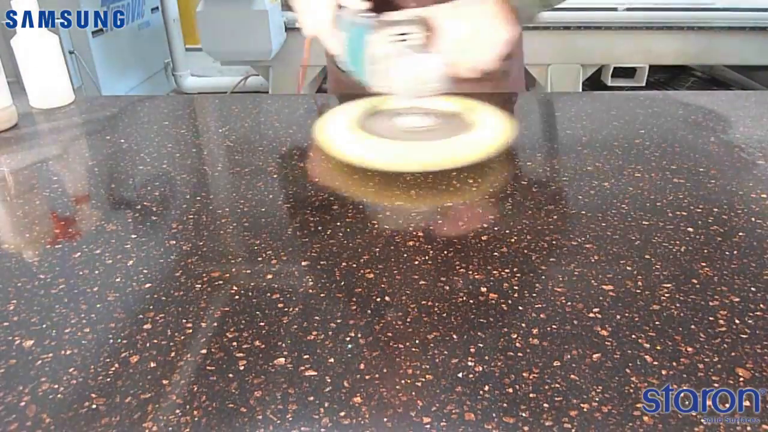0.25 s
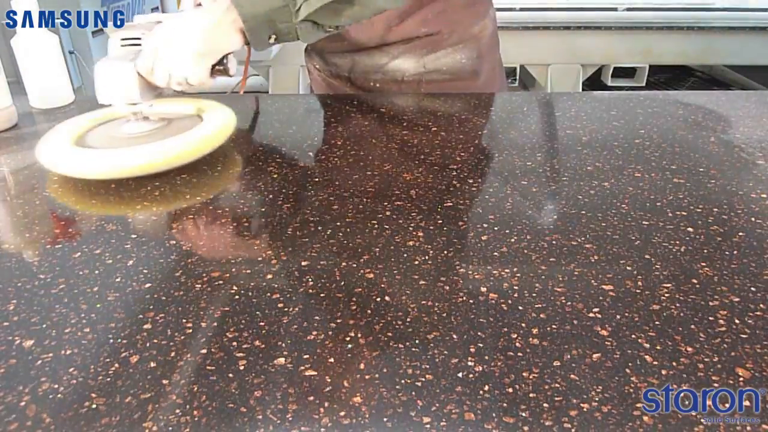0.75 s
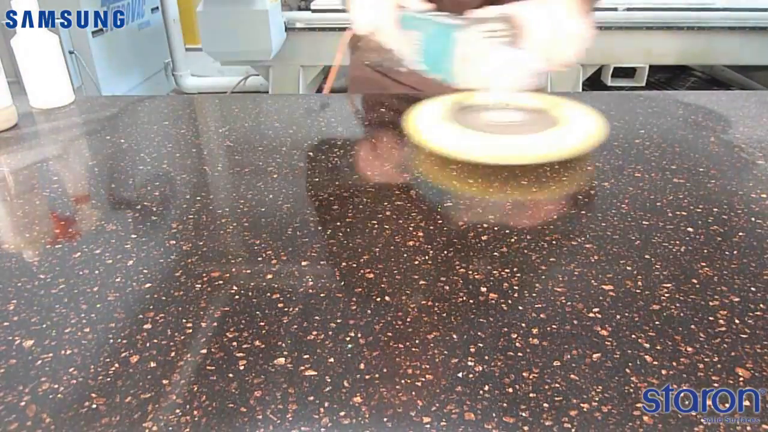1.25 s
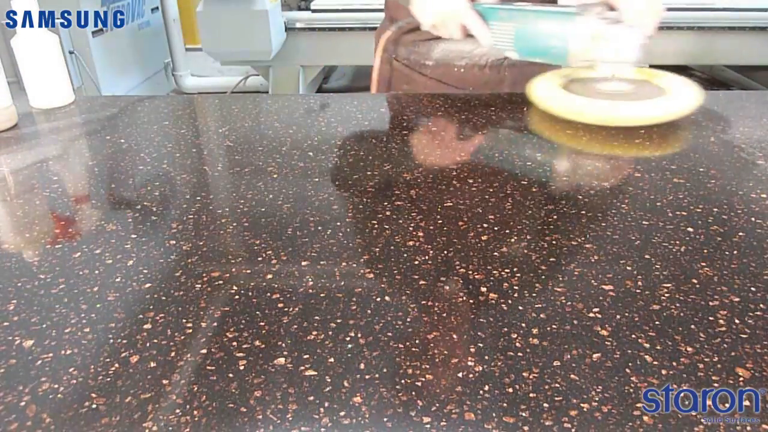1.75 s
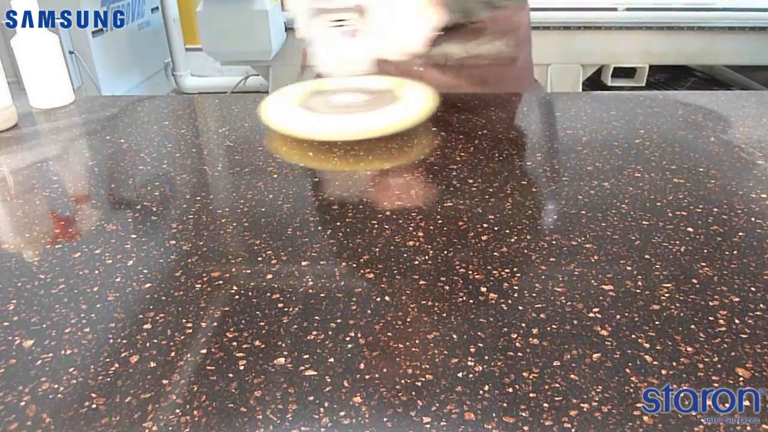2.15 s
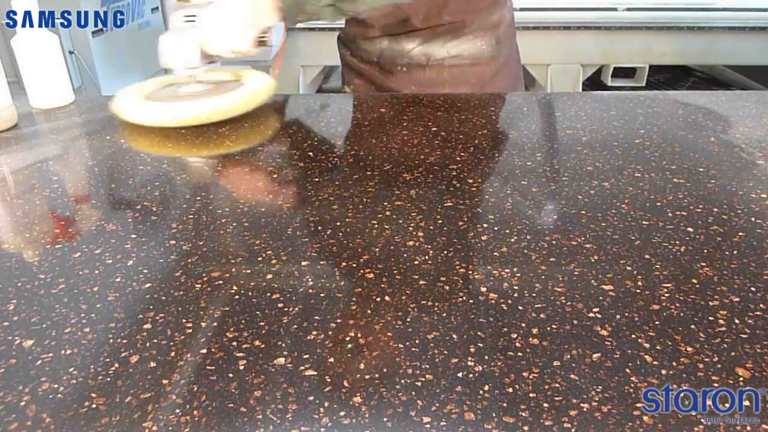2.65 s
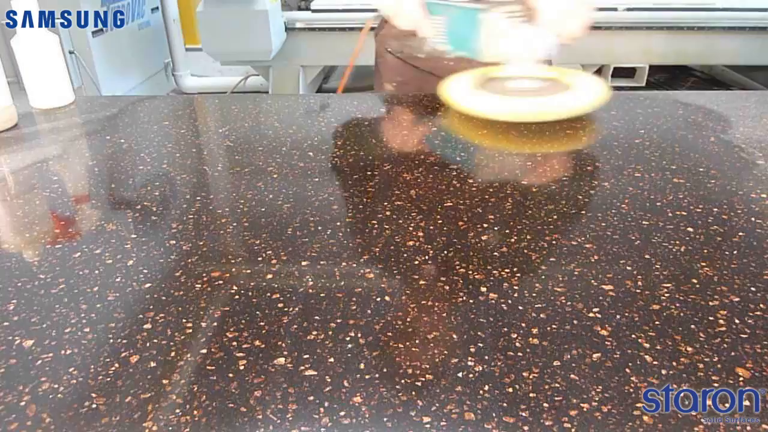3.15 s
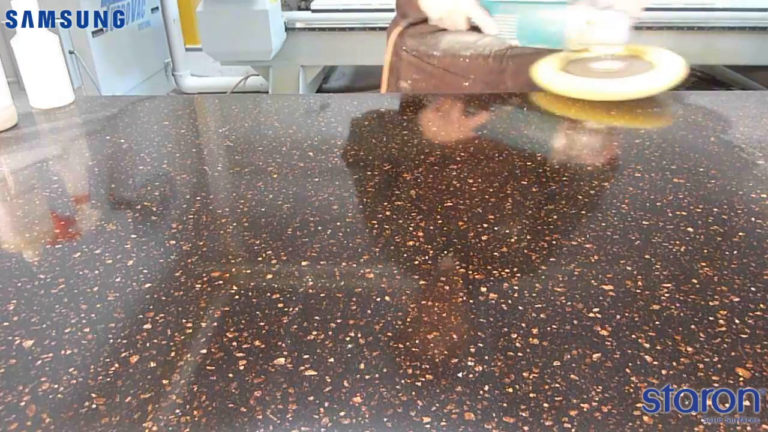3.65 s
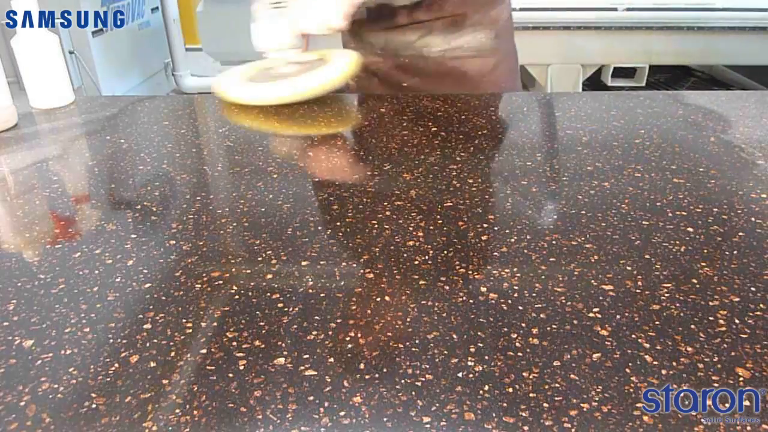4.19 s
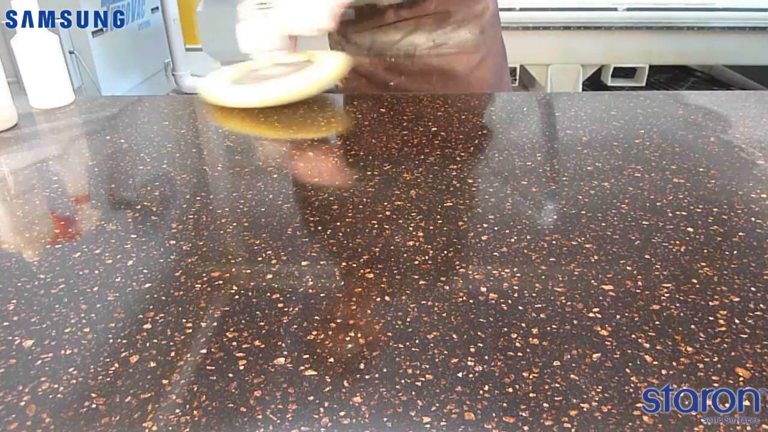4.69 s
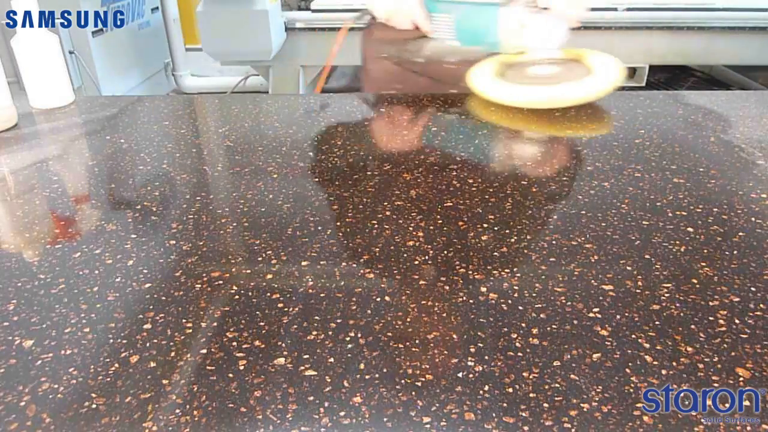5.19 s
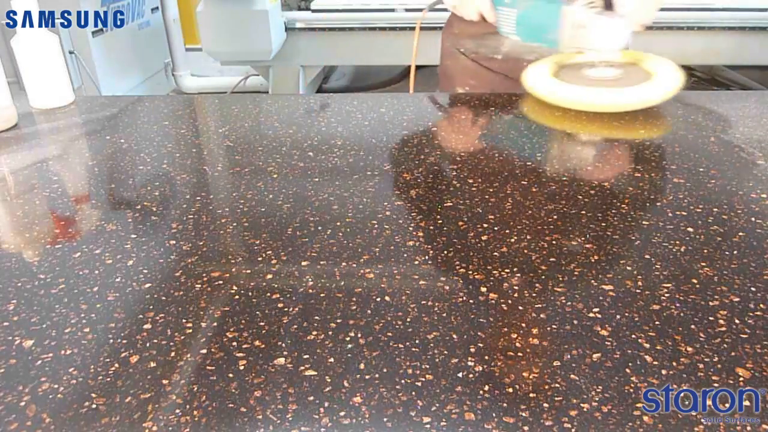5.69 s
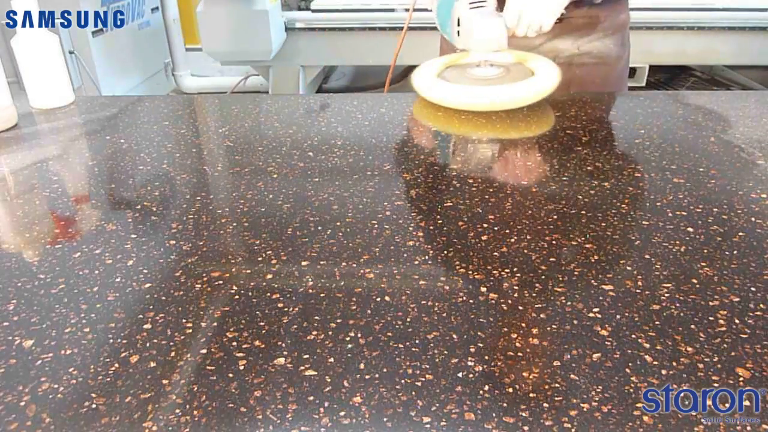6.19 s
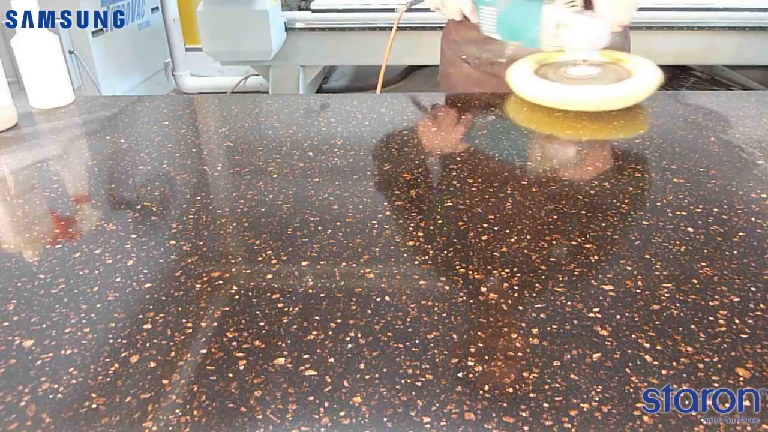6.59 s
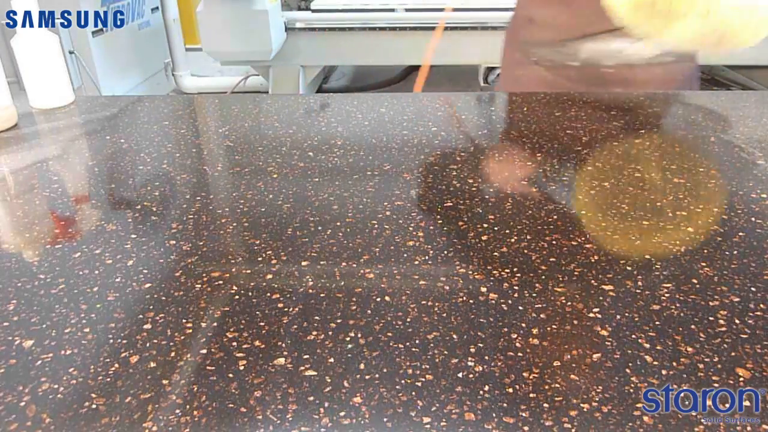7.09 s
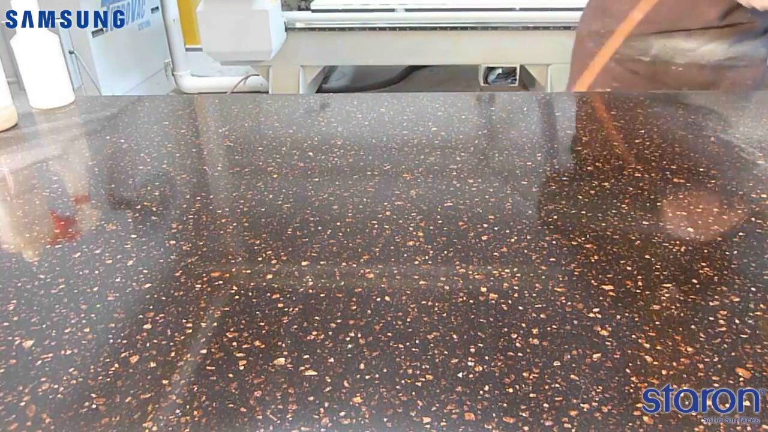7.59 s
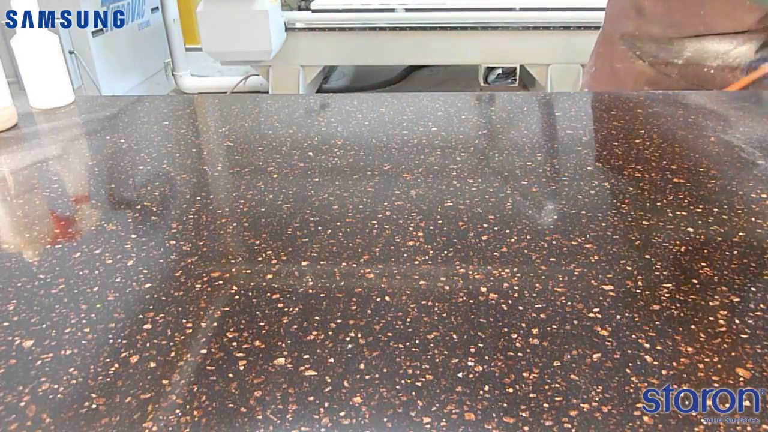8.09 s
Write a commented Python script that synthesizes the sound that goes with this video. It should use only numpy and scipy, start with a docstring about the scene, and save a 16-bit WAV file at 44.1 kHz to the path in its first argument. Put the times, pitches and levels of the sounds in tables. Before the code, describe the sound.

From the start, an electric rotary polisher runs close by, buffing a countertop with a foam pad. It makes a high, buzzing gear whine with a fast rattle and a rush of fan air. The pitch rises slightly over the first two seconds, then holds, while the tones swell and dip and the sound sweeps left and right about every two seconds. At about 5.1 seconds the tool is switched off and coasts: loose gear teeth clatter, and the whine falls steadily with a dry rasp, dying away by 7 seconds. Around 7.2 seconds a few light, sharp clicks come as the tool is lifted, with a fainter one near 7.6. The cord slides with a soft swish from 7.5 to 7.9 seconds. A low, steady machine hum, there underneath all along, swells slightly and remains until the end at about 8.4 seconds. The workshop has only faint reverberation.

```python
"""An electric rotary polisher sweeps a foam pad to and fro over a countertop, a workshop machine humming under it.
Its gears whine and rattle, pulsing with the mains and each pad turn, over fan rush and brush rasp.
Switched off at 5.1 s, it coasts to rest: slack teeth clatter, the tones sink through the housing resonances.
From 7.2 s the tool clicks as it is lifted and its cord slides; the hum swells as the gain control recovers."""
import sys
import numpy as np
from scipy import signal
from scipy.fft import rfft, irfft
from scipy.io import wavfile
from scipy.ndimage import uniform_filter1d

SR = 44100
rng = np.random.default_rng(int(sys.argv[2]) if len(sys.argv) > 2 else 0)


def unload_audio(sound):
    """Save the sound as a 16-bit wav file, at the path given as the first command line argument."""
    columns = np.transpose(np.atleast_2d(sound))
    # keep every value between -1 and 1, then stretch to whole-number steps
    steps = np.round(np.clip(columns, -1, 1) * 32767)
    wavfile.write(sys.argv[1], SR, steps.astype(np.int16))


N = 367794
TIME = np.arange(N) / SR
FREQ = np.arange(N // 2 + 1) * SR / N
TEETH, GEAR_RATIO = 6, 0.137  # pinion teeth, pad turns per motor turn
RUN_SLACK, COAST_SLACK, JOLT_SLACK = 0.3, 0.62, 0.17  # tooth play 0-1: driven, free, extra at switch-off

# gear and fan tones: (order [x motor speed], coasting level [dB], driven trim [dB],
# mains buzz [0-1], chatter [0-1], side tones [dB])
GEAR_TONES = [(6, -21, 0, 0.25, .15, -2), (9, -33, 0.5, 0.2, 0.2, -0.5), (12, -19.5, 1, 0.47, .18, -6.5),
              (18, -22, 3, 0.2, 0.6, -2.5), (24, -31.5, 0.5, .35, 0.1, -14)]
# gear case resonances: (centre [Hz], width [Hz], gain [dB])
CASE_MODES = [(1320, 350, 6), (1660, 180, -5), (2080, 240, 10.5), (2360, 170, 18), (3600, 290, 10),
              (4060, 190, 9), (4580, 250, 17), (5200, 250, -4.5)]


def undb(db):
    """Decibels to gain."""
    return 10 ** (np.asarray(db) / 20)


def unit(x):
    """Scale to rms 1."""
    return x / np.sqrt(np.mean(x ** 2))


def curve(table):
    """(time [s], value) points, interpolated per sample."""
    return np.interp(TIME, *np.transpose(table))


def colour(x, points):
    """Filter by (frequency [Hz], level [dB]) points, to rms 1."""
    hz, db = np.transpose(points)
    response = undb(np.interp(np.log(FREQ + 1), np.log(hz), db))
    return unit(irfft(rfft(x) * response, N))


def ring(x, modes):
    """Filter by (centre [Hz], width [Hz], gain [dB]) resonances, to rms 1."""
    response = sum(undb(db) * 1j * FREQ * width / (hz ** 2 - FREQ ** 2 + 1j * FREQ * width)
                   for hz, width, db in modes)
    return unit(irfft(rfft(x) * response, N))


def noise():
    """White noise."""
    return rng.standard_normal(N)


def walk(hz):
    """Smooth random drift up to about hz, rms 1."""
    coarse_s = TIME[::20]
    freq = np.fft.rfftfreq(len(coarse_s), coarse_s[1])
    spectrum = rfft(rng.standard_normal(len(coarse_s))) / (1 + (freq / hz) ** 4)
    return np.interp(TIME, coarse_s, unit(irfft(spectrum, len(coarse_s))))


def stroke():
    """Pad position, easing from one stroke end to the next."""
    # stroke ends: (time [s], position [-1 left, +1 right])
    stroke_ends = [(-.1, 0.54), (.75, -1.27), (1.62, 0.47), (2.561, -1.1), (3.53, 0.2), (4.501, -0.97),
                   (5.55, 0.63), (6.171, -0.28), (6.7, -0.078)]
    times_s, positions = np.transpose(stroke_ends)
    index = np.arange(len(times_s))
    done = np.interp(TIME, times_s, index)
    eased = np.floor(done) + (1 - np.cos(np.pi * (done % 1))) / 2
    return np.interp(eased, index, positions)


def crown_errors(pad, drift_hz=1.5, points=13):
    """Crown wheel tooth errors: a pattern that repeats each pad turn and shifts slowly."""
    errors = rng.standard_normal((2, points))
    errors -= errors.mean(axis=1, keepdims=True)
    position = pad / (2 * np.pi) * points % points
    first, second = (np.interp(position, np.arange(points + 1), unit(np.append(e, e[0]))) for e in errors)
    drift = walk(drift_hz)
    return first * np.cos(drift) + second * np.sin(drift)


def whine_levels_db(hz, coasting, speed_power=2.1, soften_db=-3.5):
    """Driven, each tone swells and drops out; coasting, it sinks through the housing resonances."""
    # driven tones at 1, 1.5 (fan), 2, 3 and 4 x tooth rate: (time [s], level [dB])
    tooth_whine = [(0.0, -18), (0.419, -22.5), (0.5, -42), (0.54, -17.5), (0.901, -30.0), (1.02, -12),
                   (1.12, -24.5), (1.2, -15), (1.34, -37), (1.38, -24.5), (1.56, -21.5), (1.76, -26),
                   (1.8, -20.5), (1.88, -35.5), (2.02, -13.5), (2.08, -33.5), (2.38, -17), (2.54, -37),
                   (2.719, -16), (2.92, -17.5), (3.02, -27.5), (3.18, -15.5), (3.36, -26.5), (3.48, -15.5),
                   (3.82, -26), (3.901, -18.5), (3.939, -31), (4.02, -20.5), (4.3, -22.0), (4.34, -27.5),
                   (4.54, -17.5), (4.641, -33), (4.9, -16.5), (5.02, -21), (5.06, -37), (5.12, -19.5)]
    fan_whine = [(0.0, -30.5), (0.08, -22.0), (0.119, -39), (0.32, -25), (0.639, -30), (0.94, -20),
                 (1.0, -28), (1.58, -24), (1.82, -37), (1.86, -20), (2.02, -31), (2.08, -19.0), (2.16, -29),
                 (2.36, -18.5), (2.882, -33), (3.14, -22), (3.2, -38), (3.239, -26.5), (3.7, -30.5),
                 (4.02, -19.5), (4.081, -35.5), (4.119, -24), (4.44, -21.5), (4.56, -28), (4.7, -21.5),
                 (5.12, -23)]
    main_whine = [(0.0, -15.5), (0.48, -19.5), (0.66, -14), (1.2, -15.5), (1.28, -24), (1.46, -14),
                  (1.66, -19), (1.7, -13), (1.78, -22.5), (1.9, -16.5), (2.0, -22), (2.12, -20.5),
                  (2.28, -15.5), (2.6, -20), (2.76, -18.0), (3.08, -21), (3.16, -32.5), (3.2, -21.5),
                  (3.3, -26), (3.36, -23), (3.52, -15), (3.56, -19), (3.58, -16), (3.9, -23.5), (3.92, -40),
                  (3.96, -21.5), (4.201, -18), (4.5, -21), (4.9, -18), (5.04, -27), (5.1, -19.5),
                  (5.12, -24)]
    upper_whine = [(0.0, -29), (0.04, -16.5), (0.2, -33.5), (0.24, -20.5), (0.7, -28.5), (0.74, -31.5),
                   (0.94, -17.5), (1.22, -26.5), (1.4, -18.5), (1.44, -44), (1.48, -19), (1.74, -23.5),
                   (1.78, -36), (1.86, -16.5), (1.98, -34), (2.28, -26.5), (2.7, -37.5), (2.98, -25.5),
                   (3.24, -25), (3.34, -41), (3.64, -23.5), (3.74, -27), (3.78, -38), (3.94, -34.0),
                   (4.5, -38), (4.56, -45), (4.88, -25.5), (5.12, -30.5)]
    top_whine = [(0.0, -35), (0.121, -43), (0.36, -27.5), (0.719, -36), (5.1, -50)]
    # housing peaks and dips: (centre [Hz], width [Hz], gain [dB])
    housing = [(487, 72, 13), (920, 75, 4), (980, 89, -9), (1140, 160, 7.5), (1394, 130, 10),
               (1730, 130, -2), (1940, 190, 7.5), (2378, 220, 11), (2590, 58, -13), (2920, 300, 10.5),
               (3860, 330, -10.5), (4720, 460, 19.5), (6400, 1300, -11.5)]
    driven_tones = (tooth_whine, fan_whine, main_whine, upper_whine, top_whine)
    speed = hz / hz.max()
    speed_db = speed_power * 20 * np.log10(speed + 1e-6)
    levels_db = []
    for (order, coast_db, trim_db, *_), driven in zip(GEAR_TONES, driven_tones):
        housing_db = sum(db / (1 + (2 * (order * hz - centre) / width) ** 2)
                         for centre, width, db in housing)
        soft_db = soften_db * order / TEETH * (1 - speed) ** 2  # slow teeth meet softly
        free_db = coast_db + speed_db + housing_db + soft_db
        levels_db.append((1 - coasting) * (curve(driven) + trim_db) + coasting * free_db)
    return levels_db


def whine(motor, pad, ripple, slack, levels_db, rotor_lag_s=0.004, flutter_db=1.5):
    """Gear and fan tones, swung by torque ripple and the off-centre pad, roughened by slack teeth."""
    jitter = 0.29 * slack ** 3 * walk(160)
    late_ripple = np.interp(TIME - rotor_lag_s, TIME, ripple)
    wobble = (0.2 + slack - RUN_SLACK) * (np.sin(pad) + slack * np.sin(3 * pad))
    contact = np.exp(slack ** 1.5 * (np.cos(pad) - 0.6 * slack))  # teeth part and meet once a pad turn
    out = 0
    for (order, _, _, buzz, chatter, _), db in zip(GEAR_TONES, levels_db):
        harmonic = order / TEETH
        level = undb(db + flutter_db * walk(18)) * (1 + buzz * ripple)
        uneven = (1 + chatter * crown_errors(pad)) / np.sqrt(1 + chatter ** 2)
        phase = order * motor + harmonic * jitter - buzz * late_ripple + wobble
        out += level * uneven * contact ** np.sqrt(harmonic) * np.sin(phase)
    return np.sqrt(2) * out


def rattle(motor, scatter_db=5, level_db=-8.5):
    """Teeth strike with uneven force and ring the gear case."""
    impacts = np.diff(np.floor(TEETH * motor / (2 * np.pi)), prepend=0)
    strikes = impacts * undb(scatter_db * noise()) * rng.choice([-1, 1], N)
    return undb(level_db) * ring(strikes + 0.47 * noise(), CASE_MODES)


def side_tones(motor, pad, level_db=-5):
    """Crown wheel errors put buzzing sidebands round each tone."""
    out = 0
    for order, *_, db in GEAR_TONES:
        phase = order * motor
        out += undb(db) * (crown_errors(pad) * np.cos(phase) + crown_errors(pad) * np.sin(phase))
    return undb(level_db) * unit(out)


def gears(motor, pad, speed, coasting, slack, coast_ring_db=11, slap_db=-6.5):
    """Gear noise, knocking once a pad turn; undriven, the slack teeth ring louder and slap."""
    case = undb(coast_ring_db * coasting) * rattle(motor)
    buzz = side_tones(motor, pad)
    slap = undb(slap_db) * coasting * backlash(motor, speed)
    knock = np.exp(0.89 * slack * (np.cos(pad) - 0.7 * slack)) * undb(0.4 * coasting * walk(30))
    return speed ** 0.4 * case * knock ** speed + speed * knock * (buzz + slap)


def reflect(x, gain=0.28, lag_s=0.001078, drift_s=0.00016):
    """Two drifting early reflections off the countertop and the worker."""
    delays_s = [k * (lag_s + drift_s * walk(1.28)) for k in (1, 2)]
    return x + gain * sum(np.interp(TIME - delay_s, TIME, x) for delay_s in delays_s)


def fan(speed, coasting, ripple, floor=0.079, coast_db=0.5):
    """Cooling air rushes with motor speed and pulses faintly with the mains."""
    # air spectrum: (frequency [Hz], level [dB])
    air_spectrum = [(40, -39.5), (100, -18.5), (230, -8.5), (450, -7.5), (820, 0), (1080, -8.5),
                    (1500, 1.5), (2000, -2), (3300, 2), (4400, -1.5), (5500, -5), (6500, -4), (7200, -10.5),
                    (7900, -57)]
    air = reflect(colour(noise(), air_spectrum))
    flow = floor + (1 - floor) * speed
    return undb(coast_db * coasting) * flow * (1 + 0.021 * ripple) * air


def motor_tones(motor, hz, coasting, cavity_hz=825, half_width_hz=70, cavity_db=5, coast_boost_db=12):
    """Unbalance, brush and upper gear tones; each wavers and swells near a hollow housing resonance."""
    # motor harmonics: (order [x motor speed], level [dB])
    harmonics = [(1, -28.5), (2, -19), (3, -22.5), (4, -19), (5, -27), (11, -16.5), (13, -17), (15, -18.5),
                 (16, -28.5), (21, -21), (24, -26)]
    peak_db = cavity_db + coast_boost_db * coasting
    out = 0
    for order, db in harmonics:
        lift_db = peak_db / (1 + ((order * hz - cavity_hz) / half_width_hz) ** 2)
        out += undb(db + lift_db + 2 * walk(3.8)) * np.sin(order * (motor + 0.011 * walk(40)))
    return np.sqrt(2) * out


def brushes(motor, speed, level_db=-24.5, grain_db=3):
    """Carbon brushes scrape the commutator unevenly each turn: a dry rasp that outlasts the fan."""
    # rasp spectrum: (frequency [Hz], level [dB])
    rasp_spectrum = [(400, -16.5), (1400, 0.5), (2200, 4), (3000, -7), (3700, 2.5), (4400, -3), (5200, 3.5),
                     (6500, -2), (7900, -21.5)]
    rasp = colour(noise() * undb(grain_db * walk(300)), rasp_spectrum)
    pressure = 1 - 0.82 * speed ** 2  # brushes ride lighter at speed
    return undb(level_db) * pressure * speed ** 0.76 * (1 + 0.41 * np.cos(motor)) * rasp


def foam(motor, pad, rub_db=-2, rub_hz=370, rub_width_hz=170, shake_db=-2):
    """The pressed, uneven pad thumps, rubs dully and passes motor shake to the countertop."""
    # thump envelope: (time [s], level [dB])
    thump_db = [(0, -71), (3.3, -43), (4.1, -34), (5.13, -34), (5.22, -44), (5.55, -50), (6.6, -73)]
    thump = np.sin(3 * pad) + 0.18 * np.sin(2 * pad) + 0.5 * np.sin(8 * pad)
    rub = undb(rub_db) * ring(noise(), [(rub_hz, rub_width_hz, 0)])
    shake = undb(shake_db) * np.sin(motor)
    return undb(curve(thump_db) + 1.9 * walk(5)) * (thump + rub + shake)


def polisher(position, off_s=5.131, coast_hz_per_s=149.5, unload_s=0.1, jolt_s=0.14, mains_hz=60):
    """One motor drives every part; after switch-off friction slows it evenly. Returns body, whine."""
    # driven motor speed: (time [s], turn rate [Hz])
    driven_hz = [(0.0, 249.2), (0.19, 250.5), (0.28, 249.6), (0.35, 250.7), (0.42, 249.5), (0.61, 251.7),
                 (0.75, 256.9), (0.9, 264.2), (1.05, 267), (1.27, 269.9), (1.45, 268.4), (1.68, 273.3),
                 (1.95, 272.5), (2.03, 271.9), (2.23, 272.5), (2.36, 272.6), (2.49, 271.5), (2.65, 274.3),
                 (2.75, 275.2), (2.9, 273.2), (3.14, 272.6), (3.32, 273.1), (3.52, 275.1), (3.66, 276.7),
                 (3.78, 275.1), (3.87, 274.5), (4.43, 274.6), (4.61, 277.1), (4.81, 273.2), (4.89, 274.9),
                 (5.07, 275.8), (5.13, 274.8)]
    since_off_s = np.maximum(TIME - off_s, 0)
    hz = np.maximum(curve(driven_hz) - coast_hz_per_s * since_off_s, 0)
    speed = hz / hz.max()
    coasting = 1 - np.exp(-since_off_s / unload_s)
    jolt = since_off_s / jolt_s * np.exp(1 - since_off_s / jolt_s)  # teeth briefly lose contact
    slack = np.clip(RUN_SLACK + (COAST_SLACK - RUN_SLACK) * coasting + JOLT_SLACK * jolt, 0, 1)
    motor = 2 * np.pi * np.cumsum(hz) / SR  # shaft angle [rad]
    pad = GEAR_RATIO * (motor - np.interp(5.261, TIME, motor))  # a knock falls at 5.261 s
    surge = 2 * np.pi * 2 * mains_hz * TIME  # torque peaks twice a mains cycle
    ripple = (TIME <= off_s) * (np.cos(surge) + 0.21 * np.cos(2 * surge))

    clatter = gears(motor, pad, speed, coasting, slack)
    clatter *= (1 + 0.071 * ripple) * undb(0.61 * walk(45))
    rush = clatter + fan(speed, coasting, ripple) + speed * motor_tones(motor, hz, coasting)
    rush_db = -13.5 - 1.5 * position ** 2 - 0.8 * TIME  # dips off centre, fades slowly
    body = undb(rush_db) * speed ** 0.77 * rush + brushes(motor, speed) + foam(motor, pad) * (hz > 0)
    tones = whine(motor, pad, ripple, slack, whine_levels_db(hz, coasting))
    return body, undb(-3.5 * jolt) * tones


def workshop(shaft_hz=29.54, hum_db=-31.5, tone_hz=403, tone_db=-46, air_db=-40):
    """A pump-like machine hums on its shaft harmonics, over a second tone and dull air."""
    # machine hum: (order [x shaft speed], level [dB])
    harmonics = [(1, -43), (2, -33), (3, -26), (4, -22), (5, -9), (6, 0.5), (7, -28.5), (8, -18),
                 (9, -15.5), (10, -9.5), (11, -23), (12, -11), (13, -14), (14, -23), (15, -36), (16, -23),
                 (17, -18.5), (18, -18), (19, -14.5), (20, -19.5), (21, -24), (23, -15.5), (24, -16.5),
                 (25, -15.5), (26, -16), (27, -24.5), (30, -22), (32, -24.5), (36, -24.5), (42, -29),
                 (54, -29.5), (60, -28.5)]
    # workshop air: (frequency [Hz], level [dB])
    air_spectrum = [(25, -29.5), (60, -30), (120, -6.5), (200, -2.5), (330, -6.5), (500, -8.5), (800, -13),
                    (1200, -16.5), (2000, -22), (3500, -24.5), (6300, -26), (7900, -38.5)]
    shaft = 2 * np.pi * shaft_hz * TIME + 0.0066 * walk(2.9)
    hum = sum(undb(db + 1.5 * walk(1.8)) * np.sin(order * shaft + rng.uniform(0, 2 * np.pi))
              for order, db in harmonics)
    tone = undb(tone_db + 2 * walk(1.6)) * np.sin(2 * np.pi * tone_hz * TIME + 0.5 * walk(2.1))
    air = undb(air_db + 0.48 * walk(14)) * colour(noise(), air_spectrum)
    return np.sqrt(2) * (undb(hum_db) * hum + tone) + air


def backlash(motor, speed, jitter_rad=0.15, slow_jitter_rad=0.45):
    """Slack teeth slap in step, blurring as they slow; overtones flare in the case resonances."""
    # slap overtones: (order [x tooth rate], level [dB])
    overtones = ((3, -3), (4, -2), (5, -6), (6, -5), (7, -7), (8, -7))
    mesh = TEETH * motor + (jitter_rad + slow_jitter_rad * (1 - speed) ** 2) * walk(180)
    return ring(sum(undb(db) * np.sin(order * mesh) for order, db in overtones), CASE_MODES)


def lift_clicks(attack_s=0.00018, width_hz=600):
    """The lifted tool clicks: each a damped tone plus noise through one broad resonance."""
    # clicks: (time [s], peak [dB], ring [Hz], t60 [s])
    clicks = [(7.1574, -26, 2550, 0.017), (7.185, -31, 2300, 0.04), (7.213, -34, 3650, 0.036),
              (7.213, -35, 5170, 0.03), (7.2977, -35, 2160, 0.036), (7.554, -40, 2596, 0.034)]
    scrape = noise()
    out = 0
    for start_s, db, hz, t60_s in clicks:
        age_s = np.maximum(TIME - start_s, 0)
        envelope = undb(-60 * age_s / t60_s) * (1 - np.exp(-age_s / attack_s))
        click = envelope * (np.sin(2 * np.pi * hz * age_s) + ring(scrape, [(hz, width_hz, 0)]))
        out += undb(db) * click / np.abs(click).max()
    return out


def cord():
    """The sliding cord swishes."""
    # slide envelope: (time [s], level [dB])
    slide_db = [(7.45, -74), (7.56, -45.5), (7.66, -46), (7.78, -49.5), (7.95, -79), (8.3, -76)]
    # swish spectrum: (frequency [Hz], level [dB])
    spectrum = [(300, -22.5), (1500, 10.5), (3500, 9.5), (6300, 9.5), (7800, -11.5)]
    return undb(curve(slide_db) + 1.2 * walk(30)) * colour(noise(), spectrum)


def place(x, pan_db, spread_db, t60_s=0.11, split_hz=1200):
    """Treble pans (pan_db: left minus right) and is spread by near reflections; bass stays central."""
    treble = irfft(rfft(x) * FREQ ** 4 / (FREQ ** 4 + split_hz ** 4), N)
    t = TIME[:SR // 5]
    spread = 0
    for _ in range(2):
        echoes = rng.standard_normal(len(t)) * undb(-60 * t / t60_s)
        reflected = signal.fftconvolve(treble + 0.13 * x, echoes / np.linalg.norm(echoes))[:N]
        spread += walk(0.74) * reflected / np.sqrt(2)
    side = undb(spread_db) * spread + np.tanh(pan_db * np.log(10) / 40) * treble
    return np.array([x + side, x - side])


def room(x, level_db=-14, t60_s=0.57):
    """Faint diffuse tail off the workshop walls."""
    tail = rng.standard_normal(SR) * undb(-60 * TIME[:SR] / t60_s)
    return undb(level_db) * signal.fftconvolve(x, tail / np.linalg.norm(tail))[:N]


def scene():
    """The polisher in front, the workshop around it; stereo."""
    position = stroke()
    body, tones = polisher(position)
    tool = body + tones
    lean = (0.07 + 0.13 * walk(2.3)) * tones  # standing waves favour the left
    around = place(workshop() + cord() + lift_clicks(), pan_db=-0.5, spread_db=-9)
    front = place(tool, pan_db=-1.2 - 4.5 * position, spread_db=-10.5)
    return front + np.array([lean, -lean]) + room(tool) + around


def record(dry, threshold_db=-21.5, release_db_per_s=5.5, rolloff_hz=6900, cutoff_hz=7650):
    """Gain control ducks fast under loud sound and recovers slowly; the top rolls off and is cut."""
    power = uniform_filter1d(np.mean(dry ** 2, axis=0), int(0.08 * SR))
    excess_db = np.maximum(10 * np.log10(np.abs(power) + 1e-12) - threshold_db, 0)
    recovery_db = release_db_per_s * TIME
    duck_db = np.maximum.accumulate(excess_db + recovery_db) - recovery_db
    out = dry * undb(-uniform_filter1d(duck_db, SR // 4))
    out = signal.sosfilt(signal.butter(10, rolloff_hz, fs=SR, output="sos"), out)
    return signal.sosfilt(signal.ellip(10, 0.2, 80, cutoff_hz, fs=SR, output="sos"), out)


dry = scene()
out = record(dry)
unload_audio(out)
```